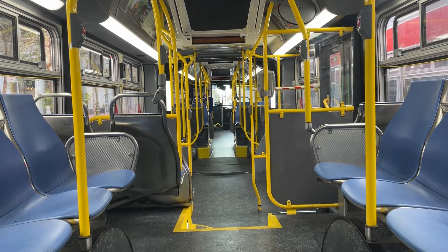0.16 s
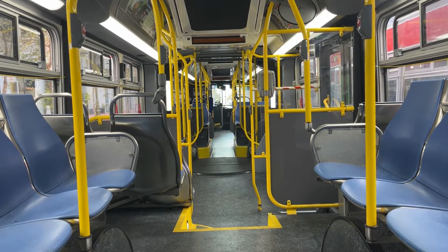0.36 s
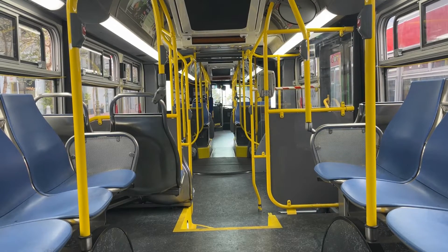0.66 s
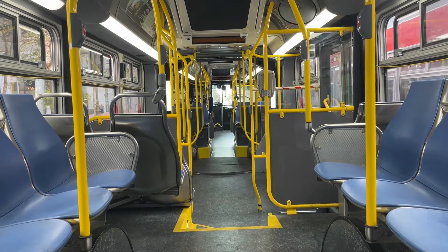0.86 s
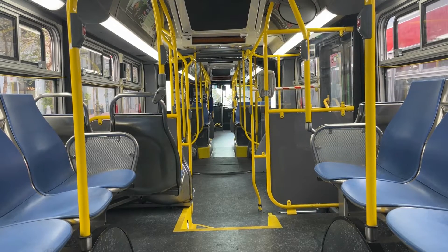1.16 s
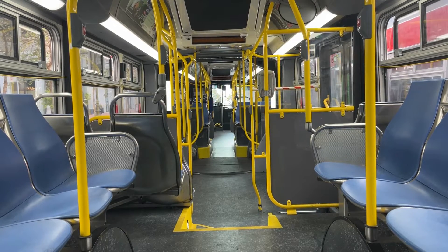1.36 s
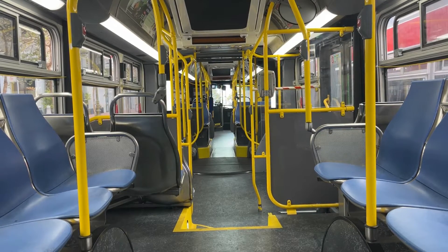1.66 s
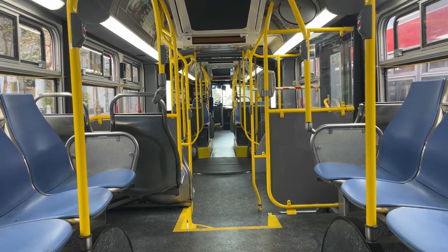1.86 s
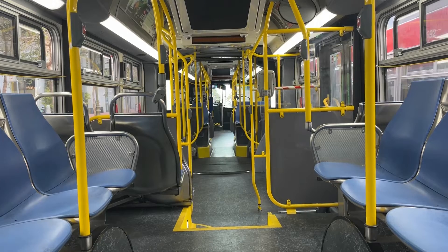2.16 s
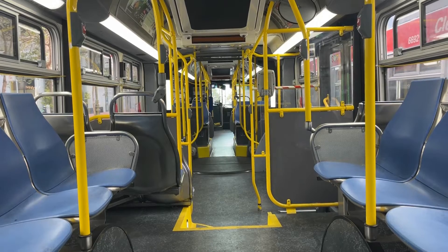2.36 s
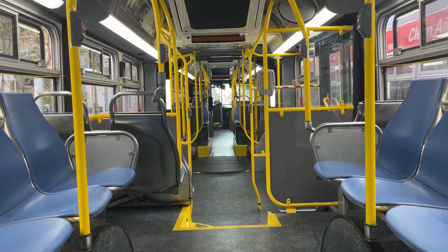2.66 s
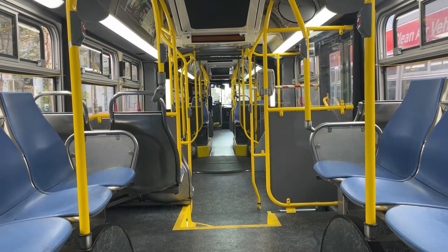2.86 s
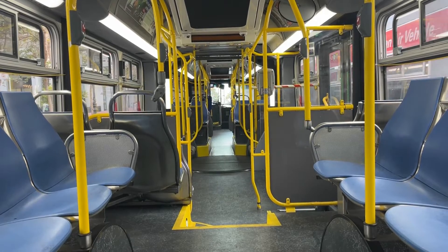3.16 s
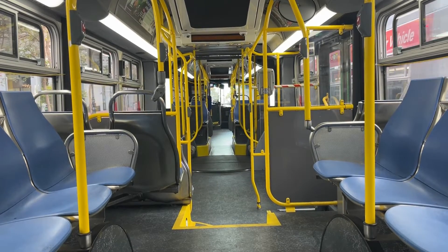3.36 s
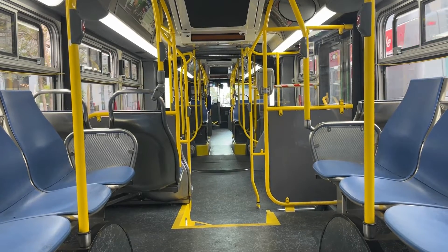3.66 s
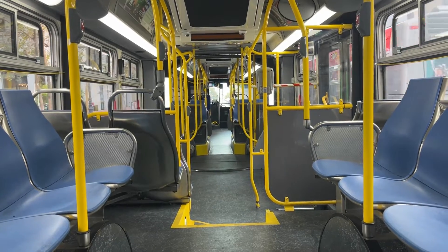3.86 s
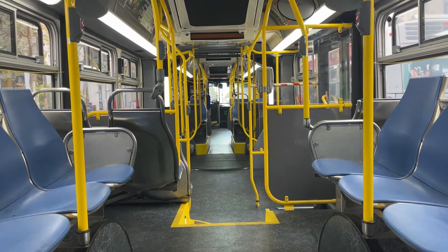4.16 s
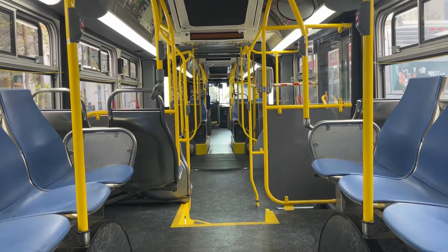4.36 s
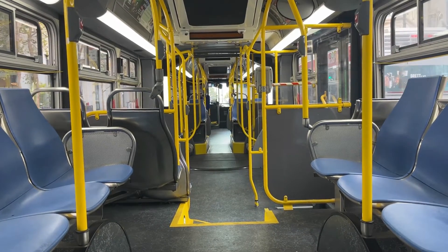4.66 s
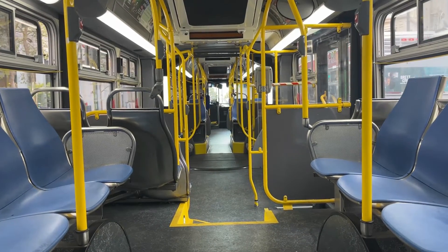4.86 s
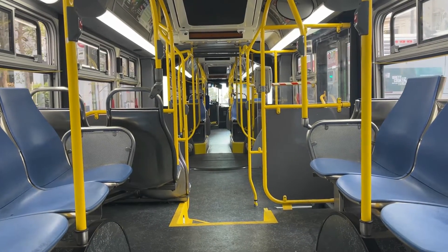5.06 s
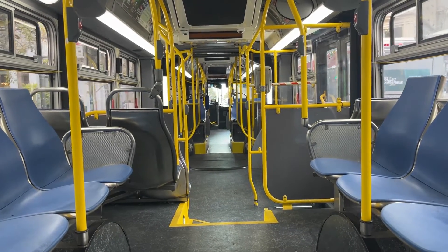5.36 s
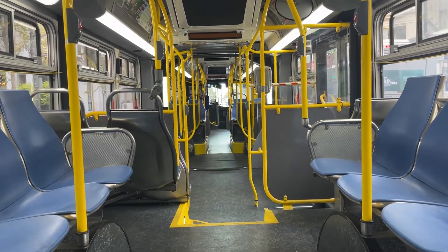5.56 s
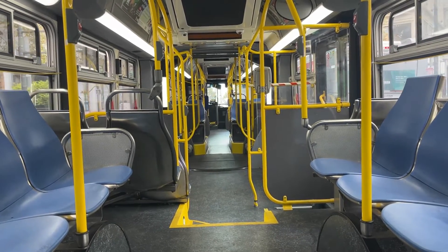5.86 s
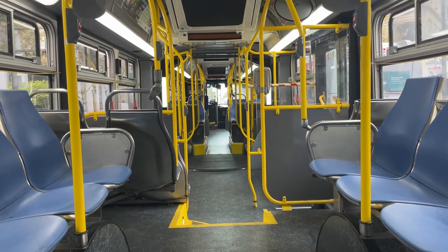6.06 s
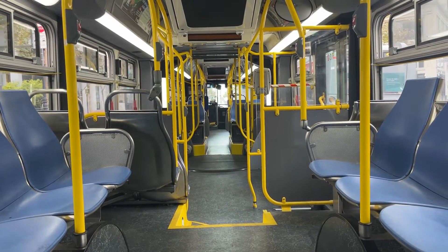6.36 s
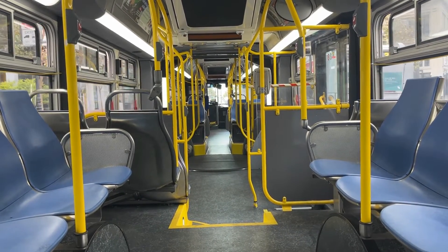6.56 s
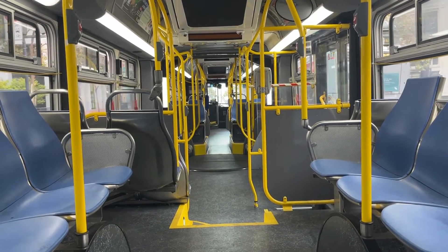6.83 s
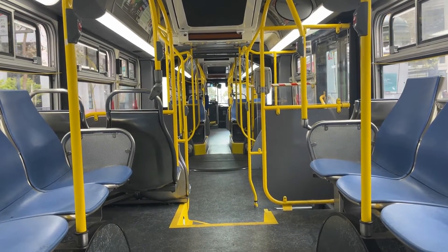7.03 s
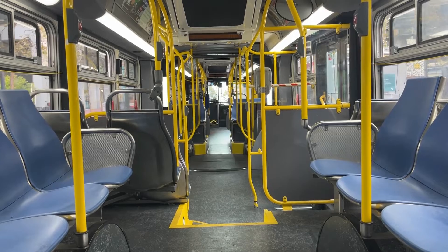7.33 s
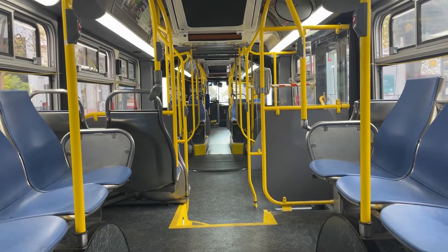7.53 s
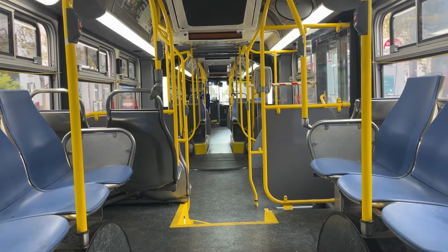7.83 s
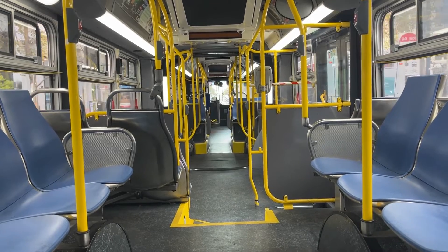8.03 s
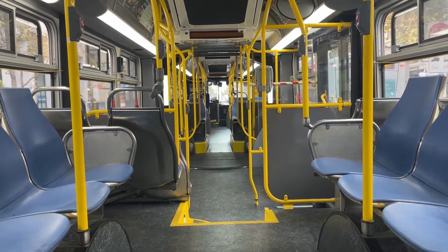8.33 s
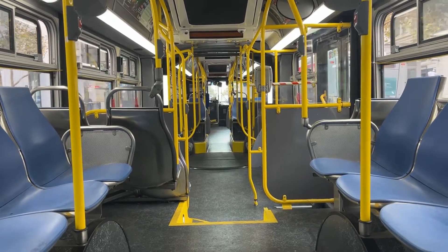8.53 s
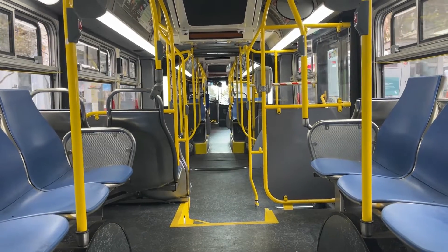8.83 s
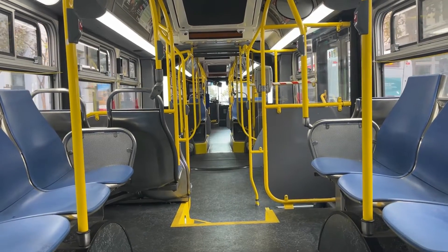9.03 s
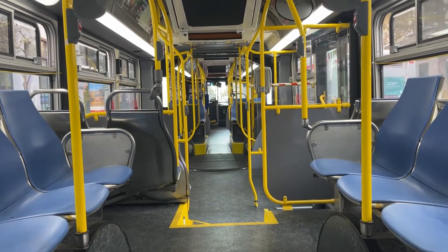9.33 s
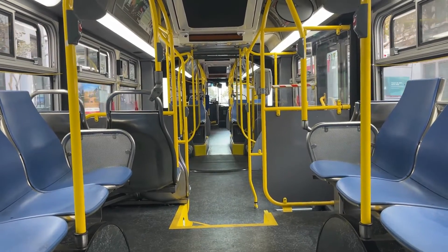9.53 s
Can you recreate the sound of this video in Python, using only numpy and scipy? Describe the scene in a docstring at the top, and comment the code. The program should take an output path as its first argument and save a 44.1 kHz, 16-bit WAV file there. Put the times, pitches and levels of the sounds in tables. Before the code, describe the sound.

Inside a city bus, captured in close stereo by a phone. From 0 to 1 s a diesel idles low and steady, throbbing through the cabin with dull fan noise and a faint squeak at 0.6. At about 1.05 brake air blows off, a bright, rough hiss swelling twice with squeaks inside and ending near 1.8. Fans and vents run up, and a very thin high whistle lingers until about 5. From 1.3 the engine climbs; a panel hums around 2 to 3.5, and a small sagging creak breaks up near 4. From 4 a slightly rough electric whine glides upward to the end as drone and road rumble grow. Engine pitch peaks near 6.6, dips, then climbs again. A faint air puff comes at 6.6. From 7.5 high metallic chirps repeat, densest at 8.5 to 9, with air puffs around 8.7 and 9.6, deep rumble surges and a sharp tick at 9.6.

```python
"""A six-cylinder diesel idles inside a hybrid bus; the brakes blow off air, then the bus pulls away.
Engine orders, sines locked to the firing cycle, ring the cabin's modes as the traction motor whines upward.
Shaped noise makes the air jets, road rumble, throbbing panels, fans and vents.
Trim squeaks, creaks and ticks on top. A phone with two microphone ports hears it.
"""
import sys
import numpy as np
from scipy import signal
from scipy.fft import rfft, irfft
from scipy.io import wavfile
from scipy.ndimage import uniform_filter1d

SR = 44100
rng = np.random.default_rng(int(sys.argv[2]) if len(sys.argv) > 2 else 0)


def master(y):
    """Save y as 16-bit WAV."""
    cut = np.clip(np.atleast_2d(y).T, -1, 1)
    pcm = np.round(cut * 32767)  # scale
    wavfile.write(sys.argv[1], SR, pcm.astype(np.int16))


N = 427329
T = np.arange(N) / SR  # time of each sample, s
F = np.arange(N // 2 + 1) * SR / N  # frequency of each spectrum bin, Hz


def undb(db):
    """Amplitude ratio of a level in dB."""
    return 10 ** (np.asarray(db) / 20)


def curves(rows):
    """Columns of a table, after its times, drawn as straight lines over every sample."""
    s, *columns = np.transpose(rows)
    return [np.interp(T, s, column) for column in columns]


def inside(rows):
    """1 while a table lasts, with soft edges."""
    gate = (T > rows[0][0]) & (T < rows[-1][0] + .01)
    return uniform_filter1d(1. * gate, size=900)


def on_log(points):
    """Amplitude at every bin, the dB running straight over log frequency."""
    hz, db = np.transpose(points)
    return undb(np.interp(np.log(F + 1), np.log(hz), db))


def walk(rate):
    """Random levels held 1 / rate s and slewed twice; spread near 1."""
    k = int(SR / rate)
    steps = np.repeat(rng.standard_normal(N // k + 1), k)
    slewed = uniform_filter1d(uniform_filter1d(steps, k), k)
    return 1.377 * slewed[:N]


def noise(colour):
    """Two unrelated noises of one colour, rms 1."""
    re, im = rng.standard_normal((2, 2, len(F)))
    x = irfft((re + 1j * im) * on_log(colour), N)
    return x / x.std()


def modes(table):
    """Summed response of damped resonances."""
    return sum(undb(db) * 1j * F * width / (hz ** 2 - F ** 2 + 1j * F * width) for hz, width, db in table)


def ringing(x, table):
    """Noise lifted at resonances."""
    return irfft(rfft(x) * (1 + np.abs(modes(table))), N)


def tone(rows, wobble, flutter_db):
    """A wavering sine; the second row is in quadrature for the other port."""
    hz, db = curves(rows)
    phase = 2 * np.pi * np.cumsum(hz * (1 + wobble * walk(25))) / SR
    level = np.sqrt(2) * undb(db + flutter_db * walk(12)) * inside(rows)
    return level * np.array([np.sin(phase), np.cos(phase)])


def orders(cycle, multiples, rows, waver_db):
    """Sines at multiples of the cycle phase, each wavering a little; one row for each."""
    lines = []
    for k, db in zip(multiples, rows):
        start = 2 * np.pi * rng.random()
        level = np.sqrt(2) * undb(db + waver_db * walk(5))
        lines.append(level * np.sin(k * cycle + start))
    return np.array(lines)


# the order that swells in each row of the next table
SWELL_ORDERS = (16, 30, 24, 16, 30, 6, 16, 16, 20, 6, 8, 12, 16, 14, 30, 28, 16, 9, 28, 12, 6, 20, 24, 28,
                6, 18, 17, 18, 12, 24, 24, 9, 16, 20, 32, 9, 17, 12, 28, 30)
# single orders swell for a while, at idle and under way: middle t/s, length/s, gain/dB
SWELLS = [(.55, 2, 3), (.55, 1.64, 10.7), (.55, 1.1, 2.5), (2.4, 0.42, 10.7), (2.55, 1.4, 16),
          (2.85, 1.43, 5.8), (3.4, 0.5, 12), (4.25, 0.78, 9.5), (4.5, 0.89, 10.7), (4.7, 0.87, 6.4),
          (5., 0.52, 5.4), (5.15, 0.88, 2.9), (5.25, 0.69, 12.8), (5.9, 0.45, 9), (5.5, 1.4, 8.5),
          (6.2, 1.1, 3.9), (6.35, 1.3, 14.4), (6.55, 1.7, 5.8), (7., 0.6, 3.6), (7., 0.61, 1.6),
          (7.6, 0.36, 3.6), (7.8, 0.64, 7), (7.9, 1, 8.7), (8.1, 1.15, 5.3), (8.55, 1.3, 7.5),
          (9.5, 1.1, 3.6), (4.25, .8, 12), (6.35, 1.5, 5), (6.35, 0.4, 4.3), (6.2, 0.5, 9.5),
          (7.15, 0.42, 8.9), (9.1, 1.8, 4.3), (7.7, 1.7, 5), (7.2, 0.74, 3.7), (5.6, 0.92, 12),
          (5.399, 0.75, 5.4), (6.2, .6, 11), (8.4, 2.1, 3.2), (8.5, 1.06, 3.2), (9.2, .9, 5)]


def swell(order):
    """dB that one order gains in its swells, each half a cosine long."""
    t = T[::256]
    gain_db = np.zeros(len(t))
    for k, (middle, length, db) in zip(SWELL_ORDERS, SWELLS):
        if k == order:
            gain_db += db * np.cos(np.pi * np.clip((t - middle) / length, -.5, .5))
    return np.interp(T, t, gain_db)


# engine speed: t/s, firing rate f/Hz
FIRING_RATE = [(0.0, 34.94), (1.05, 34.97), (1.3, 37.05), (2.05, 38.41), (2.85, 42.75), (3.25, 46.98),
               (3.65, 50.04), (4.05, 51.92), (5.25, 61.78), (6.05, 65.34), (6.45, 69.9), (6.7, 70.18),
               (7.3, 64.84), (7.65, 65.57), (8.65, 68.11), (9.05, 69.46), (9.69, 72.5)]
# engine load lifts or lowers all orders: t/s, level/dB
LOAD = [(0.0, 2), (1.1, 0.3), (1.6, -1), (2.3, 0), (3.0, 2), (3.7, -4.5), (4.5, 5), (5.4, 4), (6.3, 0.3),
        (7.0, 1.7), (7.6, 5), (8.4, -0.6), (9.0, 2.5), (9.7, -1)]
# orders: multiples of the four-stroke cycle, six firings a cycle
MULTIPLES = (3, 4, 5, 6, 7, 8, 9, 10, 11, 12, 14, 16, 17, 18, 20, 24, 27, 28, 30, 32, 36)
# each order before load, swells and cabin modes: idle level/dB, full-speed level/dB
ORDER_DB = [(-36, -49), (-53, -34.5), (-76, -37), (-37, -27.5), (-75, -21.5), (-49.5, -20.5), (-59.5, -16),
            (-57, -49), (-35, -32), (-36.5, -24.5), (-37.5, -36), (-26.5, -33), (-38, -36), (-36.5, -26),
            (-47, -30.5), (-32, -43.5), (-34, -50), (-44, -40.5), (-39.5, -50.5), (-38, -50), (-37, -55.5)]
# how much more or less of each order reaches the opposed modes: level/dB
OPPOSED_DB = (-12, -8, 2, 0.5, 5, -0.5, 5.5, -8, -1, -1, 3, -8, -11, -7, 2, -22, 2, 1, -18, 7, -19)
# cabin modes alike at both ports: f/Hz, width/Hz, level/dB
CABIN_ALIKE = [(51.3, 16.4, 2.5), (98, 34, -10.5), (134.4, 4.7, -3), (176, 89, -9), (220.1, 9.6, -5.5),
               (266.5, 3.4, 1.5), (314.6, 9, 7), (358, 46, 6.5)]
# cabin modes opposed at the two ports: f/Hz, width/Hz, level/dB
CABIN_OPPOSED = [(67.4, 7.6, -3), (76.7, 3.2, -13.5), (106, 22, -29.5), (121, 8.1, -1.5), (207, 22, -10),
                 (330, 70, -12)]


def engine():
    """Orders follow speed and load, and ring louder as they cross the cabin modes."""
    hz, = curves(FIRING_RATE)
    cycle = 2 * np.pi * np.cumsum(hz) / (6 * SR)
    speed = (hz - hz.min()) / (hz.max() - hz.min())  # 0 slowest, 1 fastest
    load_db, = curves(LOAD)
    levels_db = [idle + speed * (full - idle) + load_db + swell(k)
                 for k, (idle, full) in zip(MULTIPLES, ORDER_DB)]
    lines = orders(cycle, MULTIPLES, levels_db, waver_db=1.34)
    alike = irfft(rfft(lines.sum(axis=0)) * modes(CABIN_ALIKE), N)
    opposed = irfft(rfft(undb(OPPOSED_DB) @ lines) * modes(CABIN_OPPOSED), N)
    return np.array([alike + opposed, alike - opposed]), cycle, speed


# traction motor whine, climbing in pitch and uneven in level: t/s, f/Hz, level/dB
MOTOR = [(3.8, 276, -44), (4.4, 362, -38), (4.62, 396, -29), (4.85, 438, -33), (5.05, 478, -38),
         (5.22, 508, -31), (5.4, 538, -40), (5.6, 574, -36), (5.8, 606, -43), (6.05, 645, -34),
         (6.3, 678, -35), (6.5, 709, -43), (6.7, 730, -38), (6.9, 750, -45), (7.1, 778, -39),
         (7.35, 803, -42), (7.6, 825, -42), (7.85, 850, -47), (8.1, 874, -45), (8.35, 898, -43),
         (8.6, 926, -38), (8.85, 953, -40), (9.1, 975, -45), (9.35, 994, -37), (9.52, 1008, -44),
         (9.69, 1020, -41)]


def motor():
    """A slightly rough whine: level flicker and pitch wobble widen the line."""
    return tone(MOTOR, .0055, .9) * (.9 + .25 * walk(45))


# the brakes blow off: t/s, treble level/dB, lower part level/dB over treble, roar level/dB over treble
BRAKE = [(1.04, -52, 7, -2), (1.075, -29.5, 1, -6), (1.155, -26, 2.5, -6.5), (1.24, -29.5, 5.5, -12),
         (1.33, -29.5, 3.5, -10), (1.45, -25, 1.5, -4.5), (1.54, -27.5, 4, -2.5), (1.63, -28.5, 4, -7),
         (1.68, -37, 8.5, 1), (1.73, -44, 10.5, -3), (1.77, -48.5, 10, 2), (1.84, -58, 12, 4),
         (1.92, -75, 10, 5)]


def brake_power():
    """Power of the blow-off's treble, lower part and roar."""
    db, low_db, roar_db = curves(BRAKE)
    return (inside(BRAKE) * undb([db, db + low_db, db + roar_db])) ** 2


# hisses at speed: t/s, treble level/dB, rise/s, hold/s, treble t60/s,
# lower part level/dB over treble, roar level/dB over treble
PUFFS = [(6.58, -49.5, 0.026, .02, 4.6, 4.8, -12), (8.25, -55, 0.23, 0.2, 1.2, 10.5, 18),
         (8.62, -52, 0.076, 0.074, 0.59, 10.5, 20.5), (8.73, -37, 0.053, .02, 0.66, 2.2, 8.5),
         (8.9, -46.5, 0.055, 0.14, 0.98, 0.72, -3), (9.43, -53.5, 0.051, 0.12, 1., 12, 21.5),
         (9.61, -45, 0.033, 0.0084, 0.34, 11.4, 17)]
LOWER_LINGERS = 1.43  # t60 of the lower part and roar over the treble's


def puff_power():
    """Power of the three parts as each puff rises, holds and dies away."""
    power = np.zeros((3, N))
    for s, db, rise, held, t60, low_db, roar_db in PUFFS:
        i = int(s * SR)
        t = T[:N - i]
        tail_db = -60 * np.maximum(t - rise - held, 0) / t60
        lower_db = db + tail_db / LOWER_LINGERS
        parts = undb([db + tail_db, lower_db + low_db, lower_db + roar_db])
        power[:, i:] += (np.minimum(t / rise, 1) * parts) ** 2
    return power


# colour of the jets' treble: f/Hz, level/dB per Hz, relative
AIR_HIGH = [(5000, -20), (7000, -13), (8200, 2.5), (9700, 1.5), (12900, -1.5), (14500, -4), (15100, -12),
            (15600, -22)]
# colour of the jets' lower part: f/Hz, level/dB per Hz, relative
AIR_LOW = [(600, -4), (1500, 4), (2150, 1), (2570, -2.5), (2900, 1.5), (3550, 4), (4300, 2.5), (5500, 1),
           (7000, -0.5), (8500, -5)]
# brake pipes ring in the lower part: f/Hz, width/Hz, level/dB
BRAKE_PIPES = [(1880, 180, -2), (2480, 250, -1), (2690, 120, 0), (3170, 80, 1), (4290, 230, -3),
               (4830, 70, -2), (6405, 30, 4)]
# colour of the jets' roar: f/Hz, level/dB per Hz, relative
ROAR = [(300, -24), (550, 8.5), (900, 2), (1500, -2.5), (2500, -14), (3500, -30)]


def air():
    """Turbulent jets from brakes and puffs: treble, lower part and roar, sputtering together."""
    power = brake_power() + puff_power()
    lower = undb(-2.5) * ringing(noise(AIR_LOW), BRAKE_PIPES)
    jets = noise(AIR_HIGH), lower, noise(ROAR)
    sputter = undb(.6 * walk(30))
    return sputter * sum(np.sqrt(p) * jet * undb(0.7 * walk(14)) for p, jet in zip(power, jets))


# squeaks and short whistles of trim, seals and valves: t/s, f/Hz, width/Hz, level/dB, hold/s, t60/s
SQUEAKS = [(.59, 2700, 300, -50, .06, .1), (.648, 2840, 220, -50, 0.11, 0.14),
           (1.251, 2600, 348, -37.5, 0.23, .15), (1.5, 2610, 203, -37.5, 0.22, .15),
           (2.05, 11240, 60, -64, 0.41, .3), (4.945, 5150, 250, -54, 0.055, .1),
           (4.958, 3680, 203, -50, .04, .08), (6.379, 10200, 150, -60, 0.11, .2),
           (6.755, 10350, 116, -46, 0.024, 0.38), (7.115, 9940, 121, -52, 0.076, .3),
           (7.535, 7700, 40, -42.5, 0.15, 0.68), (7.566, 10280, 90, -35.5, 0.013, 0.44),
           (7.671, 10410, 100, -32.5, 0.041, 0.44), (7.785, 10240, 101, -42.5, 0.014, 0.94),
           (8.06, 10100, 296, -42.5, 0.035, 0.46), (8.32, 10270, 101, -44, 0.029, 0.45),
           (8.43, 10150, 100, -42.5, 0.017, 0.44), (8.47, 6500, 304.5, -53, .04, .1),
           (8.5, 10360, 100, -39.5, 0.036, 0.36), (8.63, 9900, 200, -49, .06, 0.9),
           (8.665, 7800, 40, -37, 0.12, 0.34), (8.68, 6500, 155, -48, 0.087, .2),
           (8.703, 10460, 90, -28.5, 0.017, 0.28), (8.789, 10290, 119.3, -35.5, 0.067, 0.59),
           (8.83, 6480, 254, -43, 0.077, 0.65), (8.9, 7780, 40, -37.5, 0.047, 0.62),
           (8.91, 9800, 503, -44, 0.22, 0.64), (9.16, 10200, 120, -45, 0.029, 0.2),
           (9.311, 10170, 303, -43, 0.058, 0.48), (9.431, 10020, 253, -43, 0.11, .2),
           (9.462, 6460, 150, -45.5, 0.072, .15), (9.565, 10300, 121, -38, 0.089, .3),
           (9.64, 6450, 300, -41, 0.048, .2)]
SQUEAK_ATTACK_S = 0.0032


def squeaks():
    """Stick-slip excites a narrow mode: sudden start, rough hold, ringing tail."""
    out = np.zeros((2, N))
    settle = 2000  # samples the filter runs before it is heard
    for s, hz, width, db, held, t60 in SQUEAKS:
        i = int(s * SR)
        t = T[:min(int((held + t60) * SR), N - i)]
        drive = rng.standard_normal((2, len(t) + settle))
        edges = [hz - width / 2, hz + width / 2]
        mode = signal.butter(2, edges, "bandpass", fs=SR, output="sos")
        band = signal.sosfilt(mode, drive)[:, settle:]
        shape = np.minimum(t / SQUEAK_ATTACK_S, 1) * undb(-60 * np.maximum(t - held, 0) / t60)
        out[:, i:i + len(t)] += undb(db) * shape * band / np.sqrt(2 * width / SR)  # evens out the widths
    slip = undb(1.2 * walk(45))
    return out * slip


# a creak that sags in pitch and breaks into spurts: t/s, f/Hz, level/dB
CREAK = [(3.73, 3880, -62), (3.77, 3840, -53), (3.82, 3820, -52), (3.86, 3820, -53), (3.875, 3800, -60),
         (3.9, 3790, -47), (3.93, 3830, -53), (3.96, 3780, -56), (3.995, 3760, -62), (4.025, 3740, -46),
         (4.065, 3700, -49), (4.082, 3750, -64), (4.1, 3730, -48), (4.125, 3720, -58), (4.16, 3705, -50),
         (4.2, 3700, -62)]


def creak():
    """A wavering sine whose level jumps between spurts."""
    return tone(CREAK, 0.00304, .7)


# ticks of loose fittings, before the crack and tail weights: t/s, level/dB
TICKS = [(2.0394, -54), (3.6994, -60), (4.4638, -56), (4.9494, -58), (8.6651, -54), (8.729, -50),
         (8.789, -57), (8.8926, -54), (9.6435, -42.5)]
# colour of a tick: f/Hz, level/dB per Hz, relative
TICK = [(1500, -30), (3500, 8), (7000, 1), (13000, -3), (15500, -15)]


def ticks():
    """Short bright rattles: a sharp crack and a cabin tail."""
    shape = np.zeros(N)
    for s, db in TICKS:
        i = int(s * SR)
        t = T[:min(SR // 2, N - i)]
        crack, tail = 3 * np.exp(-t / 0.004), 2.2 * np.exp(-t / 0.036)
        shape[i:i + len(t)] += undb(db) * (crack + tail)
    return shape * noise(TICK)


# a panel hums at its own pitch: t/s, f/Hz, level/dB
HUM = [(1.75, 261.2, -46), (1.95, 264.3, -33), (2.2, 265, -36), (2.5, 264.3, -34), (2.7, 258, -37),
       (2.92, 253.8, -38), (3.05, 259, -29), (3.25, 264.4, -23), (3.45, 267.5, -37), (3.65, 267, -41)]


def hum():
    """One wavering sine, the same at both ports."""
    return tone(HUM, 0.0009, 1.4)[0]


# a thin whistle, before its sidebands and faster flutter: t/s, f/Hz, level/dB
WHISTLE = [(0.92, 9840, -75), (1.11, 10000, -52), (1.45, 9922, -53), (2.3, 9885, -55), (3.28, 9830, -56),
           (3.6, 9870, -63), (3.85, 9840, -61), (4.1, 9870, -66), (4.4, 9910, -63), (5.0, 9905, -64),
           (5.3, 9900, -75)]
SIDE_HZ, SIDE_DB = 184, -14.5  # sidebands: mean distance from the line, level under it


def whistle():
    """A fluttering line; the sidebands come from a faster beat of the level."""
    line = tone(WHISTLE, .0012, .6) * undb(2.5 * walk(70))
    beat = 2 * np.pi * SIDE_HZ * np.cumsum(1 + .07 * walk(30)) / SR
    return line * (1 + 2 * undb(SIDE_DB) * np.sin(beat))


# road rumble: t/s, level/dB
ROAD = [(0, -34), (1.05, -38), (1.29, -43), (1.67, -29.5), (2.48, -37), (3.2, -34), (3.7, -28.5),
        (4.3, -29.5), (4.88, -34), (5.42, -26), (5.8, -24.5), (6.85, -26), (7.04, -28), (8.28, -26.5),
        (8.61, -18), (9.07, -24.5), (9.47, -14), (9.69, -19)]
# colour of the rumble: f/Hz, level/dB per Hz, relative
RUMBLE = [(15, -28), (28, -9), (55, 5.5), (70, 9.5), (100, -8), (200, -81)]


def road():
    """Deep noise that grows on the road, swaying slightly."""
    rumble_db, = curves(ROAD)
    return undb(rumble_db + 0.33 * walk(5.5)) * noise(RUMBLE)


# panel noise before throb and ringing: t/s, drone level/dB, boom level/dB
PULL = [(0, -33.5, -36.5), (1.3, -30.5, -28.5), (2.1, -31, -29.5), (3., -29.5, -28.5), (3.6, -26.5, -28),
        (4.4, -27, -28.5), (4.9, -25, -25.5), (5.4, -25.5, -30.5), (5.9, -22.5, -23), (6.25, -24, -25),
        (6.6, -27.5, -34), (7.05, -28.5, -25), (7.5, -28, -27), (8.3, -28.5, -27.5), (8.6, -27.5, -26.5),
        (9.69, -27, -24)]
# colour of the panels' boom: f/Hz, level/dB per Hz, relative
BOOM = [(50, -58), (75, -2.5), (100, 3.5), (150, 2.5), (200, 4.5), (240, -2.5), (400, -62.5)]
# colour of the panels' drone: f/Hz, level/dB per Hz, relative
DRONE = [(150, -10.5), (230, -7), (320, -2.5), (400, -4.5), (500, -10), (680, -15), (850, -23.5),
         (1500, -82)]
# side panels ring in the drone: f/Hz, width/Hz, level/dB
SIDE_PANELS = [(347, 11, -4), (397, 11, -6)]
DRONE_SWAY_DB, BOOM_SWAY_DB = .7, 1.2


def panels(cycle):
    """Boom and drone of the panels throb with the firings and with a third of their rate."""
    drone_db, boom_db = curves(PULL)
    throb = 1 + .25 * np.sin(6 * cycle) + .15 * np.sin(2 * cycle)
    boom = undb(boom_db + BOOM_SWAY_DB * walk(3.47)) * noise(BOOM)
    drone = undb(drone_db + DRONE_SWAY_DB * walk(2.94)) * ringing(noise(DRONE), SIDE_PANELS)
    return throb * (boom + drone)


RUN_UP_S = (0.12, 2.02)  # fans and vents run up as the bus starts: from, to
FAN_DB, FAN_SPEED_DB = (-39, -36.5), 4  # (idle, running) before ringing; lift at full engine speed
DUCT_CHANGE_S = (1.2, 1.68)  # from the slow fans' colour to the running one
# the slow fans' duller colour: f/Hz, level/dB per Hz, relative
FAN_SLOW = [(500, -1), (850, 2), (1050, 1.5), (1250, -4), (1650, -4), (1900, -9.5), (2300, -31),
            (3000, -40)]
# air ducts over the slow fans: f/Hz, width/Hz, level/dB
DUCTS_SLOW = [(610, 8.7, 2.5), (655, 17, 6), (1004, 27, 0), (1510, 15, -2), (1530, 25, 1), (1730, 35, 3),
              (2000, 14, 8)]
# the running fans' colour: f/Hz, level/dB per Hz, relative
FAN = [(500, -4), (850, 2), (1120, 2), (1350, -3.5), (1620, -4.5), (1900, -9), (2300, -17), (3000, -44)]
# air ducts over the running fans: f/Hz, width/Hz, level/dB
DUCTS = [(665, 26, 3.5), (1128, 10.4, 1), (1203, 19, -7), (1267, 12, -13), (1563, 21, -5), (1654, 22, 0.5),
         (1864, 18, -7.5)]
# a fan's blade tone climbs: t/s, f/Hz, level/dB
BLADE = [(1.6, 630, -52), (1.82, 645, -41), (2.1, 668, -47), (2.6, 682, -47), (3.1, 690, -50),
         (3.4, 692, -56)]


def fans(speed):
    """Fan noise rings the air ducts and crossfades in colour as it runs up, with a blade tone."""
    up = np.interp(T, DUCT_CHANGE_S, (0, 1))
    slow = np.sqrt(1 - up) * ringing(noise(FAN_SLOW), DUCTS_SLOW)
    running = np.sqrt(up) * ringing(noise(FAN), DUCTS)
    fan_db = np.interp(T, RUN_UP_S, FAN_DB) + FAN_SPEED_DB * speed
    return undb(fan_db + .7 * walk(6)) * (slow + running) + tone(BLADE, 0.0039, 0.99)


VENT_DB = (-48.5, -44.5)  # (idle, running) before ringing
# colour of the vents' hiss: f/Hz, level/dB per Hz, relative
VENT = [(1500, -10), (2200, 1), (2650, 1.5), (3050, -3.5), (4900, -6.5), (6400, -13), (7500, -14),
        (8300, -29), (9200, -13), (10300, -16.5), (12000, -22), (14200, -24), (14700, -42), (15300, -50)]
# vent outlets ring: f/Hz, width/Hz, level/dB
GRILLES = [(2560, 23, -8), (2900, 31, -4.5), (3055, 19, -3), (3310, 18, 1), (3660, 29, -4.5),
           (4780, 140, -7)]


def vents():
    """Swaying hiss of air through ringing outlets, rising with the fans' run-up."""
    vent_db = np.interp(T, RUN_UP_S, VENT_DB)
    return undb(vent_db + .7 * walk(9)) * ringing(noise(VENT), GRILLES)


# the two ports: f/Hz, likeness 0-1, lead of the right/radians
PORTS = [(0, 0.6, 2.5), (60, 0.93, 0.5), (90, 0.69, 0.5), (170, 0.85, 0.74), (397, 0.67, 0.91),
         (700, 0.16, 1), (1310, 0.22, 2.5), (1715, 0.62, 4.5), (2000, .55, 6.5), (2730, 0.45, 6),
         (3370, 0.2, 4.5), (4800, 0.44, 8), (5400, 0.7, 8), (6760, .3, 8), (7820, 0.92, 9),
         (8300, 0.9, 9.5), (8860, 0.82, 10), (9880, 1, 11), (10400, 0.74, 11), (12000, 0.9, 14.5),
         (12400, .9, 22), (13000, 0.65, 18), (13700, .35, 12), (14200, 0.8, 13.5), (14800, 1, 9.5)]
# level of the left port over the right: f/Hz, level/dB
LEFT_OVER_RIGHT = [(40, -7), (100, 0), (1000, 1.5), (2000, 1.5), (5500, 4), (8000, -0.5)]


def ports(pair):
    """The right port hears part of the left sound a little earlier, and part of its own."""
    hz, like, lead = np.transpose(PORTS)
    like = np.clip(np.interp(F, hz, like), 0, 1)
    lead = np.interp(F, hz, lead)
    shared, own = rfft(pair)
    tilt = np.sqrt(on_log(LEFT_OVER_RIGHT))
    right = like * np.exp(1j * lead) * shared + np.sqrt(1 - like ** 2) * own
    return irfft([shared * tilt, right / tilt], N)


def scene():
    """Engine and hum reach the ports directly; all else passes the two-port spread."""
    lines, cycle, speed = engine()
    background = road() + panels(cycle) + fans(speed) + vents()
    highs = air() + whistle() + creak() + squeaks() + ticks()
    return lines + hum() + ports(motor() + highs + background)


TOP_HZ = 15650


def record(dry):
    """The phone cuts the top with a steep low-pass."""
    low_pass = signal.ellip(14, .5, 70, TOP_HZ, fs=SR, output="sos")
    return signal.sosfilt(low_pass, dry)


dry = scene()
out = record(dry)
master(out)
```